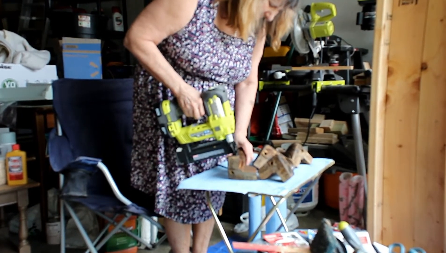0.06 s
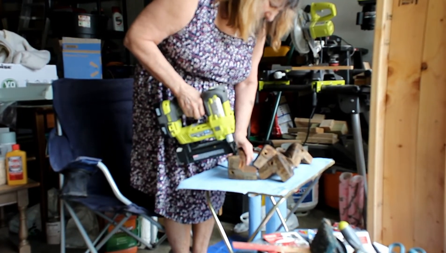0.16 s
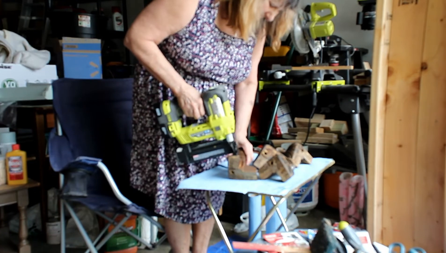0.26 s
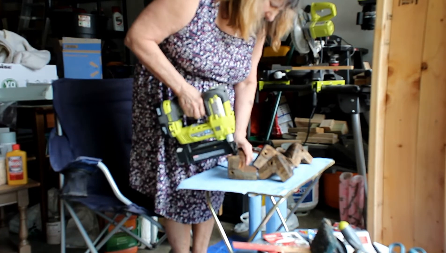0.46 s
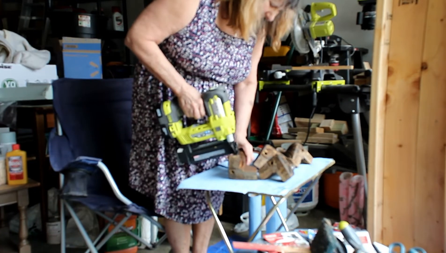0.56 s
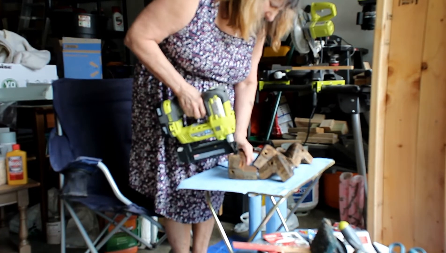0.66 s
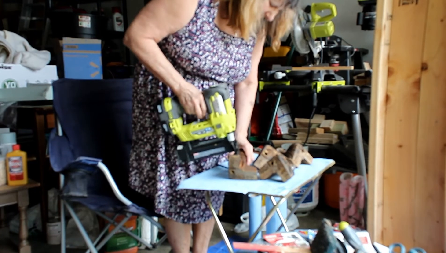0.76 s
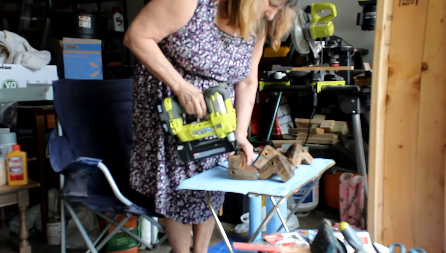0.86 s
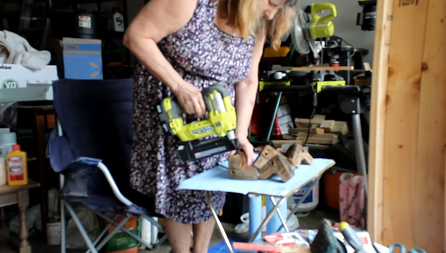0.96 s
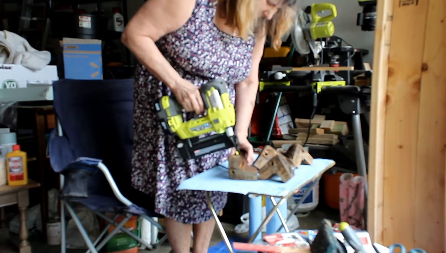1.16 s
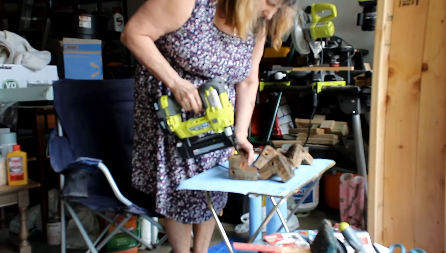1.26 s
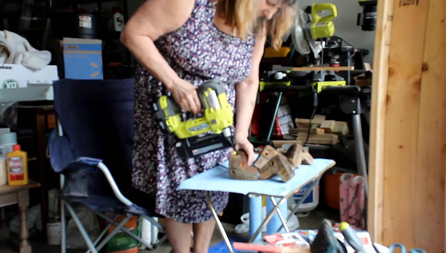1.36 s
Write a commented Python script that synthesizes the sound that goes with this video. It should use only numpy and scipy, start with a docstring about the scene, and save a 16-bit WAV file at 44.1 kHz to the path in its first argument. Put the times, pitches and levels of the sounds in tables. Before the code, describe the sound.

A battery nail gun fires once in a garage. Faint air and high insect hiss; a small tick near 0.17 s starts a harsh, gear-whining motor grind. At 0.40 s a dry, overloaded bang drives a nail into wood on a light table. At 0.53 s the piston snaps back with a hollow knock. Housing ring and diffuse tail fade, with faint ticks near 0.7-0.8 and 1.25 s; the background stays ducked, slowly recovering.

```python
"""Insects hiss outside a garage; then a battery nail gun fires once.
The motor grinds up against the air piston with whines: random tooth contacts, gearbox resonances, gliding tones.
The driver slams the nail into wood on a light folding table: noise cracks and struck modes.
The piston snaps back, the cylinder knocks and the housing rings on; the garage adds a diffuse tail.
The small recorder turns its gain down on loud sound, recovers slowly and overloads on the shot."""
import sys
import numpy as np
from scipy import signal
from scipy.fft import rfft, irfft
from scipy.io import wavfile

SR = 44100
rng = np.random.default_rng(int(sys.argv[2]) if len(sys.argv) > 2 else 0)


def transcribe(signal):
    """Save signal, clipped to [-1, 1], as a 16-bit WAV file at the path in sys.argv[1]."""
    frames = np.atleast_2d(signal).T
    limited = np.clip(frames, -1, 1)
    pcm = np.round(limited * 32767).astype(np.int16)
    wavfile.write(sys.argv[1], SR, pcm)


def gain_from_decibels(decibels):
    """Convert decibel values to linear amplitude factors."""
    exponent = np.asarray(decibels, float) / 20
    return 10 ** exponent


N = 61739


def noise():
    """White noise, rms 1."""
    return rng.standard_normal(N)


def at_hz(points, hz):
    """Read a table on a log-frequency axis."""
    table_hz, value = np.transpose(points)
    return np.interp(np.log(hz), np.log(table_hz), value)


def rms_one(x):
    """Scale to rms 1."""
    return x / np.sqrt(np.mean(x ** 2) + 1e-20)


def drift(rate_hz):
    """Slow random wander, rms 1: noise through a double one-pole low-pass."""
    r = np.exp(-2 * np.pi * rate_hz / SR)
    settle = 20000
    wander = signal.lfilter([1], [1, -2 * r, r * r], rng.standard_normal(N + settle))
    return rms_one(wander[settle:])


def resonate(x, hz, width_hz):
    """Band-pass resonance with gain 1 on top."""
    r = np.exp(-np.pi * width_hz / SR)
    gain = (1 - r * r) / 2
    poles = [1, -2 * r * np.cos(2 * np.pi * hz / SR), r * r]
    return signal.lfilter([gain, 0, -gain], poles, x + 1e-18)


def resonate_twice(x, hz, width_hz):
    """Two equal resonances in series: steeper skirts."""
    return resonate(resonate(x, hz, width_hz), hz, width_hz)


def bands(x):
    """Third-octave bands: centre Hz and signal."""
    edges_hz = 25 * 2 ** (np.arange(29) / 3)
    out = []
    for low, high in zip(edges_hz, edges_hz[1:]):
        sos = signal.butter(2, [low, high], "band", fs=SR, output="sos")
        out.append((np.sqrt(low * high), signal.sosfilt(sos, x)))
    return out


def colour(x, spectrum):
    """Causal colouring: a minimum-phase filter of the spectrum, power gain 1."""
    hz = np.maximum(np.arange(4097) * SR / 8192, 10)
    ceps = irfft(np.log(gain_from_decibels(at_hz(spectrum, hz))))
    ceps[1:4096] *= 2  # fold to minimum phase
    ceps[4097:] = 0
    h = irfft(np.exp(rfft(ceps)))
    return signal.fftconvolve(x, h / np.sqrt(np.sum(h ** 2)))[:N]


def low_cut(x, hz):
    """Third-order high-pass."""
    return signal.sosfilt(signal.butter(3, hz, "high", fs=SR, output="sos"), x)


def dying(start_s, t60_s):
    """Envelope that jumps to 1 and falls 60 dB in t60."""
    t = np.arange(N) / SR - start_s
    return (t >= 0) * gain_from_decibels(-60 * np.maximum(t, 0) / t60_s)


def window(start_s, length_s):
    """Half-sine swell and the 0-1 position inside it."""
    u = np.clip((np.arange(N) / SR - start_s) / length_s, 0, 1)
    return np.sin(np.pi * u), u


# garage air: (frequency [Hz], density [dB per Hz])
AIR_COLOUR = [(15, -47.5), (25, -15), (80, -0.5), (318, -9), (353, -9.5), (525, -13), (703, -8.5),
              (5840, -25.5), (7420, -21.5), (14000, -49)]
# insect hiss bands: (frequency [Hz], width [Hz], mean level [dB])
INSECT_BANDS = [(7800, 2000, -59.5), (8000, 900, -65.5), (8510, 1900, -64.5)]
AIR_DB, INSECT_THROB_DB = -50.5, 1.5


def background():
    """Coloured-noise garage air plus insects: narrow noise bands that throb irregularly."""
    air = gain_from_decibels(AIR_DB) * rms_one(colour(noise(), AIR_COLOUR))
    insects = np.zeros(N)
    for hz, width_hz, db in INSECT_BANDS:
        throb = gain_from_decibels(db + INSECT_THROB_DB * drift(12))
        insects += throb * rms_one(resonate_twice(noise(), hz, width_hz))
    return air + insects


# small ticks and shifts of the work:
# (time [s], level [dB], frequency [Hz], width [Hz], t60 [s])
SMALL_TICKS = [(.169, -38.5, 2200, 3050, 0.048), (0.696, -46, 12500, 1440, .03),
               (0.7, -39.5, 8000, 2000, 0.028), (0.794, -52, 8700, 2640, .03),
               (0.7942, -46.5, 225, 147, 0.71), (0.7925, -44.5, 1100, 603, 0.43),
               (1.2467, -50, 7780, 2000, 0.037)]
# thin high pips: (start [s], length [s], level [dB])
PIP_TIMES = [(0.15, 0.038, -56.5), (0.723, .02, -66), (1.148, .027, -70), (1.323, 0.028, -64.5)]
PIP_HZ, PIP_WIDTH_HZ = 10790, 120


def small_sounds():
    """Ticks: dying noise bursts through resonances. Pips: swells of one narrow noise band."""
    ticks = np.zeros(N)
    for s, db, hz, width_hz, t60_s in SMALL_TICKS:
        burst = gain_from_decibels(db) * dying(s, t60_s) * noise()
        ticks += resonate_twice(burst, hz, width_hz) * np.sqrt(SR / width_hz)  # offset band loss
    swells = sum(gain_from_decibels(db) * window(s, length_s)[0] for s, length_s, db in PIP_TIMES)
    pips = swells * rms_one(resonate_twice(noise(), PIP_HZ, PIP_WIDTH_HZ))
    return ticks + pips


# gear whines and hums that sing out for a moment:
# (start [s], length [s], first frequency [Hz], last frequency [Hz], level [dB])
GEAR_WHINES = [(.167, .055, 1025, 1040, -35), (.263, .03, 3790, 3890, -24), (.279, .034, 3250, 3310, -19),
               (.316, .038, 3070, 2850, -17.5), (.362, .032, 4070, 3930, -19),
               (.336, .027, 5330, 5060, -25), (.301, .027, 6010, 5910, -25), (.262, .043, 1207, 1214, -25),
               (.256, .1, 326, 334, -35), (.256, .1, 206, 214, -39), (.302, .085, 498, 482, -31),
               (.346, .045, 838, 832, -31), (.386, .02, 4740, 4560, -24), (.155, .016, 6100, 6000, -52),
               (.165, .05, 470, 470, -40), (.295, .025, 2880, 2920, -23)]
WHINE_ROUGH, WHINE_WAVER = .45, .004  # rms fraction of amplitude, of frequency


def whines():
    """Gliding gear tones, rough in level and unsteady in pitch."""
    out = np.zeros(N)
    for start_s, length_s, first_hz, last_hz, db in GEAR_WHINES:
        swell, u = window(start_s, length_s)
        hz = (first_hz + (last_hz - first_hz) * u) * (1 + WHINE_WAVER * drift(80))
        rough = 1 + WHINE_ROUGH * drift(100)
        cycles = np.cumsum(hz) / SR + rng.random()
        out += gain_from_decibels(db) * swell * rough * np.sin(2 * np.pi * cycles)
    return out


# garage decay: (frequency [Hz], t60 [s])
GARAGE_DECAY = [(60, .06), (130, 0.13), (420, 0.36), (700, .45), (1500, .48), (4000, .48), (8000, 0.44),
                (14000, .26)]
GARAGE_DB, GARAGE_GAP_S = -11, 0.0013


def garage(x):
    """Diffuse tail: convolution with noise dying band by band after a short gap."""
    tail = sum(b * dying(GARAGE_GAP_S, at_hz(GARAGE_DECAY, hz)) for hz, b in bands(noise()))
    return signal.fftconvolve(x, tail / np.sqrt(np.sum(tail ** 2)))[:N]


# motor load while it winds the piston:
# (time [s], level [dB], treble tilt about 1 kHz [dB per octave])
MOTOR_LOAD = [(0.159, -69.5, 5.3), (0.167, -45, -1.5), (0.178, -18, -3), (.2, -14, -1.2),
              (0.239, -12.5, 1.4), (0.289, -9, 0.7), (.36, -12.5, 2.2), (0.401, -13, 0.97),
              (.409, -40, -0.4)]
# gear train colour: (frequency [Hz], density [dB per Hz])
GRIND_COLOUR = [(59, -73.5), (100, -43), (209, -21.5), (258, -32.5), (326, -14), (497, -9.5), (552, -19),
                (825, -6), (2090, -8), (2990, -9.5), (3610, -6.5), (8060, -16), (12000, -39.5),
                (15500, -52)]
# resonances the teeth excite: (frequency [Hz], width [Hz], relative level [dB])
GEARBOX_RESONANCES = [(1855, 15, -7), (2562, 10, 2), (2820, 44, -16.5), (3553, 110, -2), (3670, 62, -6.5),
                      (4123, 15, -1), (4820, 8.3, 0), (4780, 35, -21.5), (5550, 43, -12), (6350, 55, -2),
                      (7870, 29, -3.5), (7886, 110, 5)]
TEETH_PER_S, TOOTH_SPREAD_DB = 6000, 0.5  # mean rate, mean excess
GEARBOX_DB, GRIND_FLICKER_DB = -6.5, 0.5


def motor():
    """Dense random tooth contacts, coloured and rung in the gearbox; load sets level and tilt."""
    s, level_db, tilt = np.transpose(MOTOR_LOAD)
    t = np.arange(N) / SR
    hits = rng.random(N) < TEETH_PER_S / SR
    sign = rng.choice([-1, 1], N)
    teeth = hits * sign * gain_from_decibels(TOOTH_SPREAD_DB * rng.exponential(1, N))
    box = np.zeros(N)
    for k, (hz, width_hz, db) in enumerate(GEARBOX_RESONANCES):
        box += (-1) ** k * gain_from_decibels(db) * rms_one(resonate(teeth, hz, width_hz))
    raw = rms_one(colour(teeth, GRIND_COLOUR)) + gain_from_decibels(GEARBOX_DB) * rms_one(box)
    tilt = np.interp(t, s, tilt)
    out = np.zeros(N)
    for hz, band in bands(raw):
        out += band * gain_from_decibels(tilt * np.log2(hz / 1000) + GRIND_FLICKER_DB * drift(18))
    return out / np.std(raw) * gain_from_decibels(np.interp(t, s, level_db, left=-120, right=-120))


STRIKE_SPREAD_DB = 1.5
CONTACT_S = .0001  # softness of a blow


def modes(contacts, table):
    """Each contact strikes every decaying mode at its own strength; soft contact dulls the sum."""
    out = np.zeros(N)
    for hz, level_db, t60_s in table:
        for start_s, db, _ in contacts:
            phase = 2 * np.pi * hz * (np.arange(N) / SR - start_s)
            strike_db = db + level_db + rng.normal(0, STRIKE_SPREAD_DB)
            out += gain_from_decibels(strike_db) * dying(start_s, t60_s) * np.sin(phase)
    r = np.exp(-1 / (CONTACT_S * SR))
    return signal.lfilter([1 - r], [1, -r], out)


def cracks(contacts, spectrum):
    """Each contact is a noise burst that jumps up and dies, then is coloured."""
    envelope = sum(gain_from_decibels(db) * dying(s, t60_s) for s, db, t60_s in contacts)
    return colour(noise() * envelope, spectrum)


# release, driver on nail, piston on bumper, rebound: (time [s], level [dB], t60 [s])
SHOT_CONTACTS = [(.4012, -11.5, 0.061), (.4049, 2, 0.026), (.4068, 12, 0.011), (.4102, 3, 0.013),
                 (.4123, 7.5, 0.015), (.417, 2.5, 0.11)]
# shot crack colour: (frequency [Hz], density [dB per Hz])
SHOT_CRACK_COLOUR = [(24, -41), (40, -16), (363, -3), (790, -8), (1630, -2), (3560, -7.5), (4800, -2.5),
                     (5440, -10.5), (6170, -2), (7540, -8), (16000, -44.5)]
# gun housing modes: (frequency [Hz], relative level [dB], t60 [s])
HOUSING_MODES = [(1615, -4, .1), (1780, -2, .14), (2487, -12, .13), (2810, -13, .15), (3010, -6, .09),
                 (3270, -5, .15), (3435, -6, .18), (3750, -10, .08), (4016, -16, .18), (5000, -22, .2),
                 (5500, -22, .2), (6010, -19, .2), (6220, -14, .14), (6650, -21, .2)]
# wood and table top modes: (frequency [Hz], relative level [dB], t60 [s])
TABLE_MODES = [(130, -4.5, 0.059), (171, -11, 0.22), (972, -3, .08), (1058.6, -8.5, 0.32), (1179, 2, .14),
               (1126, -0.5, 0.073), (1660, 5.5, .06), (4830, -15, .12)]
SHOT_HOUSING_DB, SHOT_TABLE_DB, SHOT_LOW_CUT_HZ = -23, -17.5, 85


def shot():
    """Driver, nail and bumper contacts crack and strike housing and table modes."""
    crack = cracks(SHOT_CONTACTS, SHOT_CRACK_COLOUR)
    housing = gain_from_decibels(SHOT_HOUSING_DB) * modes(SHOT_CONTACTS, HOUSING_MODES)
    table_top = gain_from_decibels(SHOT_TABLE_DB) * modes(SHOT_CONTACTS, TABLE_MODES)
    return low_cut(crack + housing + table_top, SHOT_LOW_CUT_HZ)


# one knock a stroke: (time [s], level [dB], contact t60 [s], not used by modes())
CYLINDER_KNOCKS = [(.405, -7, .01), (.5294, -8.5, .01)]
# hollow air cylinder: (frequency [Hz], relative level [dB], t60 [s])
CYLINDER_MODES = [(421, 0, .1)]


def cylinder():
    """Hollow decaying cylinder mode, struck at each end of the stroke."""
    return modes(CYLINDER_KNOCKS, CYLINDER_MODES)


# contacts as the piston snaps back: (time [s], level [dB], t60 [s])
RETURN_CONTACTS = [(.5284, -33, 0.014), (.5293, 5.5, 0.014), (.5305, -9, 0.012), (.532, -7, 0.011),
                   (.5342, 4.5, 0.011), (.5388, -8, 0.12)]
# return crack colour: (frequency [Hz], density [dB per Hz])
RETURN_CRACK_COLOUR = [(100, -37), (300, -4), (1000, -7), (1610, -1), (3200, 3), (4670, -7), (6290, -4),
                       (9820, -14.5), (12500, -30.5), (15500, -38)]
RETURN_HOUSING_DB, SNAP_LOW_CUT_HZ = -10.5, 190


def snap_back():
    """Piston return contacts crack and strike the housing; cylinder and lasting ring join in."""
    ring = housing_ring()
    crack = cracks(RETURN_CONTACTS, RETURN_CRACK_COLOUR)
    housing = gain_from_decibels(RETURN_HOUSING_DB) * modes(RETURN_CONTACTS, HOUSING_MODES)
    return low_cut(crack + housing + cylinder() + ring, SNAP_LOW_CUT_HZ)


# broad lasting housing ring: (frequency [Hz], width [Hz], level [dB], t60 [s])
HOUSING_RING = [(428, 72, -36, 1.04), (1596, 170, -26.5, 0.82), (1870, 250, -28, 0.72),
                (3020, 130, -40, 0.99), (3270, 380, -22, 0.73), (4070, 340, -29.5, 0.72),
                (5950, 1600, -34.5, 0.85)]


def housing_ring():
    """Resonant noise bands that start on the second return contact and die slowly."""
    start_s = RETURN_CONTACTS[1][0]
    out = np.zeros(N)
    for hz, width_hz, db, t60_s in HOUSING_RING:
        band = resonate(resonate(noise(), hz, width_hz), hz, 3 * width_hz)
        out += gain_from_decibels(db) * dying(start_s, t60_s) * rms_one(band)
    return out


def scene():
    """Gun with its garage tail, small sounds and background."""
    gun = motor() + whines() + shot() + snap_back()
    return (gun + gain_from_decibels(GARAGE_DB) * garage(gun) + small_sounds() + background())[None]


MIC_ROLL_HZ, TOP_CUT_HZ = 11300, 15700


def microphone(x):
    """Gentle treble roll-off, then a steep top cut."""
    x = signal.sosfilt(signal.butter(2, MIC_ROLL_HZ, fs=SR, output="sos"), x)
    return signal.sosfilt(signal.cheby2(12, 60, TOP_CUT_HZ, fs=SR, output="sos"), x)


GAIN_FROM_DB, GAIN_SHARE = -11.5, 0.83  # threshold, share of the excess removed
GAIN_RELEASE_DB_PER_S, GAIN_ATTACK_S = 15, 0.0027


def auto_gain(x):
    """Level above the threshold pulls the gain down; it recovers at a steady dB rate."""
    level_db = 10 * np.log10(signal.lfilter([.01], [1, -.99], x[0] ** 2) + 1e-12)
    wanted_db = GAIN_SHARE * np.maximum(level_db - GAIN_FROM_DB, 0)
    ramp_db = GAIN_RELEASE_DB_PER_S * np.arange(N) / SR
    cut_db = np.maximum.accumulate(wanted_db + ramp_db) - ramp_db  # held peak, linear release
    r = np.exp(-1 / (GAIN_ATTACK_S * SR))
    cut_db = signal.lfilter([1 - r], [1, -r], cut_db)
    return x * gain_from_decibels(-cut_db)


OVERLOAD, OUTPUT_LOW_CUT_HZ = .99, 35


def overload(x):
    """Hard clipping, then the output low cut."""
    return low_cut(np.clip(x, -OVERLOAD, OVERLOAD), OUTPUT_LOW_CUT_HZ)


def low_pass(x):
    """Removes everything above the highest recorded frequency."""
    return signal.sosfilt(signal.butter(12, 20000, fs=SR, output="sos"), x)


def record(dry):
    """Small recorder: microphone, automatic gain, overload."""
    mix = overload(auto_gain(microphone(dry)))
    return low_pass(mix)


dry = scene()
out = record(dry)
transcribe(out)
```